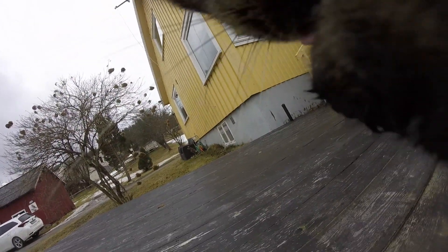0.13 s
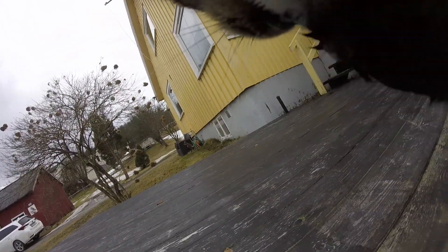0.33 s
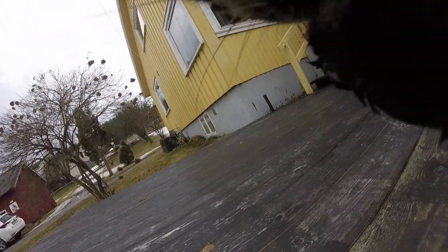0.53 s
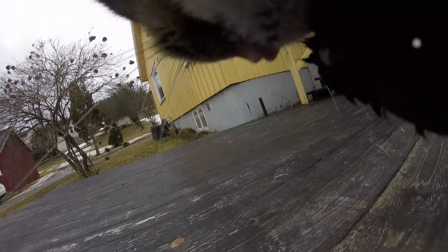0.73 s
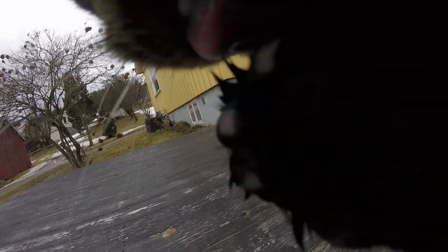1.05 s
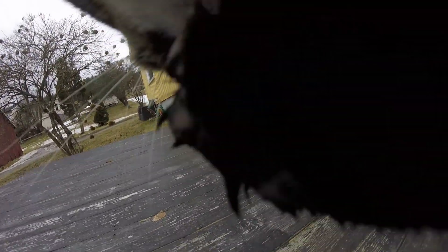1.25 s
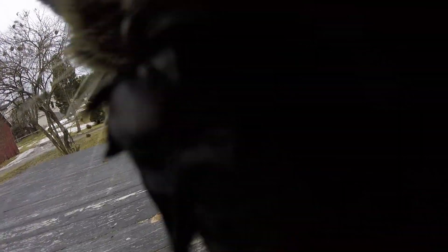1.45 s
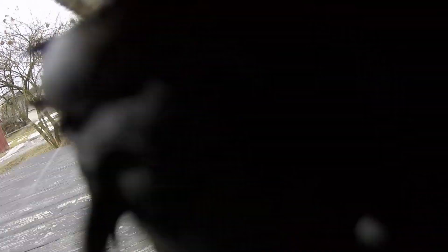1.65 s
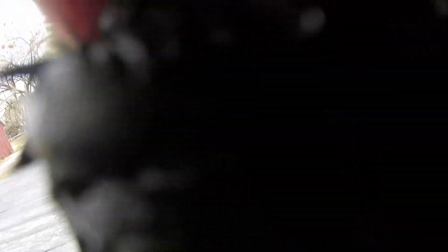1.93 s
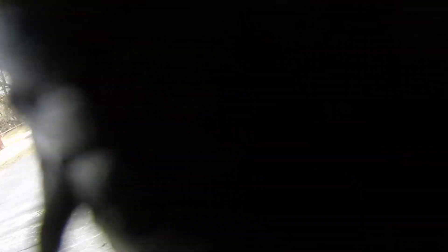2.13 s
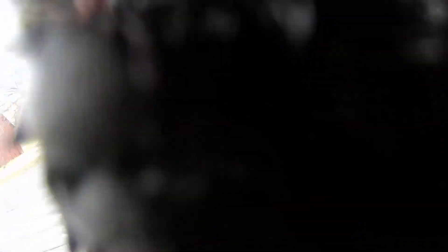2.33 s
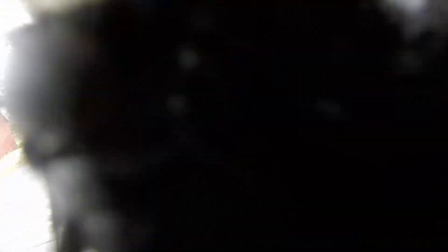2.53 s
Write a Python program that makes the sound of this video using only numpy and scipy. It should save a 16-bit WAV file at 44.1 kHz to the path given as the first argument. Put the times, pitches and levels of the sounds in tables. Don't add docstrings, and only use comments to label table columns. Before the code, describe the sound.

Close, scratchy cat licking in short uneven strokes, with claw ticks and low thumps on plastic

```python
import sys
import numpy as np
from scipy import signal
from scipy.fft import rfft, irfft
from scipy.io import wavfile
from scipy.ndimage import uniform_filter1d

SR = 44100
rng = np.random.default_rng(int(sys.argv[2]) if len(sys.argv) > 2 else 0)


def to_linear_factor(level_db):
    exponent = np.asarray(level_db, float) / 20
    return 10 ** exponent


def wav_record(signal):
    frames = np.transpose(np.atleast_2d(signal))
    bounded = np.clip(frames, -1, 1)
    quanta = np.round(bounded * 32767).astype(np.int16)
    wavfile.write(sys.argv[1], SR, quanta)


N = 119070


def level(x, db):
    return x * to_linear_factor(db) / np.sqrt(np.mean(x ** 2))


def noise():
    return rng.standard_normal(N)


def band(x, low_hz, high_hz):
    return signal.sosfilt(signal.butter(2, [low_hz, high_hz], "bandpass", fs=SR, output="sos"), x)


def walk(changes_per_s):
    hold = int(SR / changes_per_s)
    steps = np.repeat(rng.standard_normal(N // hold + 1), hold)
    smooth = uniform_filter1d(uniform_filter1d(steps, hold), hold)
    return 1.242 * smooth[:N]


def ring(push, modes, scatter_db=0.):
    out = 0
    for k, (pitch_hz, width_hz, level_db) in enumerate(modes):
        sharp = signal.iirpeak(pitch_hz, pitch_hz / width_hz, SR)
        wide = signal.iirpeak(pitch_hz, pitch_hz / width_hz / 3.176, SR)
        tone = signal.lfilter(*wide, signal.lfilter(*sharp, push))
        strength = to_linear_factor(level_db + scatter_db * walk(14.018))
        out = out + (-1) ** k * strength * tone
    return out


def slips(per_s):
    hit = rng.random(N) < per_s / SR
    extra_db = 2.6 * np.minimum(rng.exponential(size=N), 2)
    size = to_linear_factor(extra_db) * noise()
    patchy_db = 1.4 * walk(90) + .4 * walk(24.935)
    return level(hit * size, 0) * to_linear_factor(patchy_db)


def pressure(start_s, hardest_s, end_s):
    t = np.arange(N) / SR
    up = np.clip((t - start_s) / (hardest_s - start_s), 0, 1)
    down = np.clip((t - hardest_s) / (end_s - hardest_s), 0, 1)
    swell = .12 * (up > 0) + .88 * up ** 1.3
    return swell * (1 - down ** 2.4)


def contact(rows, shares):
    rows = np.array(rows)
    power = np.array([pressure(*times) ** 2 for times in rows[:, :3]])
    pushes = []
    for share in shares:
        strength = to_linear_factor(rows[:, 3] + share * rows[:, 4])
        pushes.append(uniform_filter1d(np.sqrt(strength ** 2 @ power), size=300))
    return pushes


# pitch_hz, level_db (dB per Hz)
AIR_COLOUR = [(8.8, -32.5), (15, -9.5), (68, -5.5), (1090, -24.5), (1260, -25), (1830, -28), (2060, -29.5),
              (6360, -33.5), (15200, -48.5)]


def air():
    hz = np.maximum(np.arange(N // 2 + 1) * SR / N, 1)
    pitch_hz, level_db = np.transpose(AIR_COLOUR)
    colour_db = np.interp(np.log(hz), np.log(pitch_hz), level_db)
    hiss = irfft(rfft(noise()) * to_linear_factor(colour_db), N)
    hiss = signal.sosfilt(signal.butter(2, 60, "highpass", fs=SR, output="sos"), hiss)
    housed = ring(noise(), BODY_MODES + EDGE_MODES + DULL_MODES, 0.96)
    rumble = band(noise(), 14, 34)
    swell_db = 2.2 * walk(6.03) + 2.2 * (np.arange(N) / SR - 1)
    return level(hiss, -59) + level(housed, -63) + level(rumble, -56) * to_linear_factor(swell_db)


# start_s, hardest_s, end_s, level_db, weight_db
FUR_DRAGS = [
    (0.054, .1, 0.406, -54.5, -6),
    (0.381, 0.437, 0.4384, -46.5, -8),
    (.5, .54, .72, -51.5, -3),
    (.575, .6, .65, -47, 5),
    (0.852, 0.959, 1.014, -50.5, 0),
    (1.33, 1.42, 1.454, -56, -3),
    (1.702, 1.762, 1.953, -59, -3),
    (1.806, 1.876, 1.95, -50, -6),
    (2.163, 2.33, 2.39, -50.5, -5),
    (2.6, 2.69, 2.79, -55, -3),
]
# pitch_hz, width_hz, level_db
DULL_MODES = [(1270, 280, -6.5), (1465, 199, -2.5), (1736, 200, -1)]
# pitch_hz, width_hz, level_db
DEEP_MODES = [(220, 250, -13), (700, 900, -14)]


def fur():
    rasp = slips(9000)
    light, heavy = contact(FUR_DRAGS, (0, 1))
    dull = ring(rasp * light, DULL_MODES, 1.5)
    deep = ring(rasp * heavy, DEEP_MODES, 1.5)
    return (dull + deep) * to_linear_factor(18)


# start_s, hardest_s, end_s, level_db, brightness_db
TONGUE_STROKES = [(.065, .1, .3, -53.5, -3), (.2, .285, .335, -45.5, -1), (.39, .455, .505, -48.5, 0),
                  (.5, .55, .775, -48.5, 0), (.575, .592, .655, -39.5, 3), (.77, .87, 1.125, -49.5, 0),
                  (.9, .96, 1.02, -49, -1), (1.01, 1.05, 1.1, -54, 7), (1.125, 1.15, 1.33, -52.5, 1),
                  (1.17, 1.205, 1.28, -40.5, -1), (1.4, 1.47, 1.54, -45.5, -1),
                  (1.47, 1.51, 1.543, -45.5, 0), (1.59, 1.605, 1.705, -49.5, 0),
                  (1.81, 1.85, 1.92, -50.5, -3), (1.855, 1.89, 1.948, -46.5, 7.5),
                  (2.0, 2.095, 2.128, -48, -4), (2.23, 2.29, 2.36, -47.5, -2), (2.29, 2.343, 2.388, -45, 9),
                  (2.435, 2.48, 2.595, -50, -3), (2.47, 2.496, 2.54, -51, -6)]
# pitch_hz, width_hz, level_db
BODY_MODES = [(1702.4, 230.4, -7.5), (2182, 280, -4.5), (2480.4, 271, -1.5), (2800, 180, -3),
              (2980, 150, -5.5), (3230, 250, -12)]
# pitch_hz, width_hz, level_db
EDGE_MODES = [(3550, 350, -11.5), (4050, 320, -13.5)]
# pitch_hz, width_hz, level_db
BRIGHT_MODES = [(4850, 654, -19.5), (6213.5, 330, -12), (6800, 713, -17.5), (8272, 695, -23)]
# pitch_hz, width_hz, level_db
SHEEN_MODES = [(9800, 1500, -33), (11700, 1800, -32), (14000, 2000, -37.5)]


def tongue():
    rasp = slips(10000)
    groups = (BODY_MODES, EDGE_MODES, BRIGHT_MODES, SHEEN_MODES)
    pushes = contact(TONGUE_STROKES, (0, .45, 1, 1.15))
    out = np.zeros(N)
    for push, modes in zip(pushes, groups):
        out += ring(rasp * push, modes, 1.9)
    return out * to_linear_factor(15)


# start_s, level_db (peak), softness_ms
CLAW_TICKS = [
    (0.069, -39, 0.2),
    (0.385, -33, 0.162),
    (0.482, -25.5, 0.114),
    (0.815, -23.5, 0.185),
    (1.908, -32, 0.206),
    (2.331, -32, 0.22),
    (2.356, -30.5, 0.24),
]
# pitch_hz, width_hz, level_db
CLAW_MODES = [(450, 734, -19), (1620, 190, -4.5), (1870, 300, -11), (2181, 220, -1.5), (2817, 200, -10)]


def claw():
    push, t = np.zeros(N), np.arange(N) / SR
    for start_s, level_db, softness_ms in CLAW_TICKS:
        width_ms = max(softness_ms, .03)
        shape = np.exp(-((t - start_s) * 1000 / width_ms * 2) ** 2)
        push -= to_linear_factor(level_db) * shape / width_ms
    return to_linear_factor(0.5) * ring(push, CLAW_MODES)


# start_s, level_db, pitch_hz (rocking), swings (count), way (first direction, +/-)
PAW_BUMPS = [(.5, -39.5, 16.66, 1.58, -0.87), (.565, -41, 30, 1, 1), (.61, -38, 30, 1.52, 0.894),
             (.66, -41, 18, 1.3, -1), (.98, -44.5, 28.8, 1.46, 0.99), (1.155, -38.5, 18.7, 1.75, 1),
             (1.192, -38, 55, 1.5, -1), (1.222, -39, 45, 2.4, -1), (1.54, -41.5, 23.99, 1.95, 1),
             (1.649, -32, 55, 1.6, 1), (1.671, -30, 50, 1.7, 0.902), (1.849, -27, 23, 1.7, 1),
             (1.92, -38, 30, 2, -1), (2.013, -32, 47, 2.99, 0.94), (2.078, -26, 56, 1.9, 0.9929),
             (2.12, -36.5, 17.22, 2.02, 0.77), (2.28, -27, 19.9, 1.8, 0.989), (2.348, -34.5, 60, 1.2, 1),
             (2.36, -38, 24, 2.2, -1.136), (2.479, -34.5, 49.8, 1.87, 0.996),
             (2.56, -42.5, 22.09, 1.305, 0.99)]


def paw():
    out, t = np.zeros(N), np.arange(N) / SR
    for start_s, level_db, pitch_hz, swings, way in PAW_BUMPS:
        progress = np.clip((t - start_s) * pitch_hz / swings, 0, 1)
        swell = np.sin(np.pi * progress) ** 1.68
        turn = 2 * np.pi * pitch_hz * (t - start_s)
        stop = .24 * min(pitch_hz / 50, 1) ** 2
        rocking = np.sin(turn) + stop * way * np.cos(2 * turn) - stop / 3 * np.sin(3 * turn)
        out += way * to_linear_factor(level_db) * swell * rocking
    judder = band(noise(), 70, 220)
    return out * (1 + level(judder, -24))


def scene():
    return (air() + fur() + tongue() + claw() + paw())[None]


def roll_off(x):
    return signal.sosfilt(signal.butter(12, 15310, fs=SR, output="sos"), x)


def record(dry):
    mix = signal.sosfilt(signal.ellip(8, .2, 60, 15250, fs=SR, output="sos"), dry)
    return roll_off(mix)


dry = scene()
out = record(dry)
wav_record(out)
```